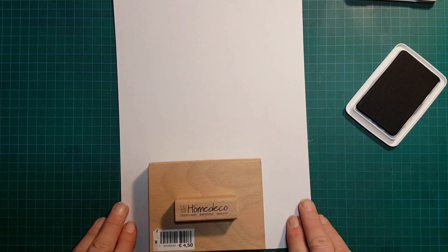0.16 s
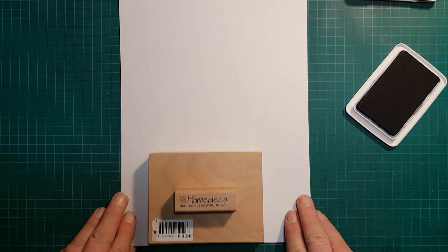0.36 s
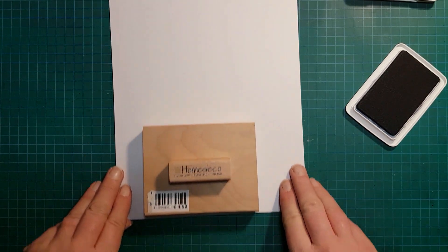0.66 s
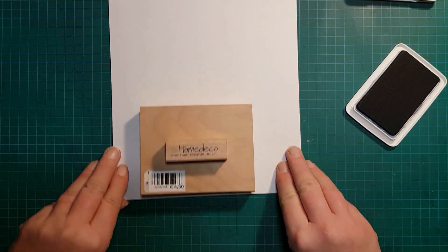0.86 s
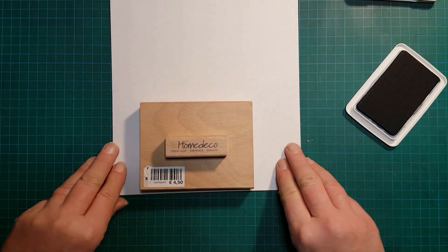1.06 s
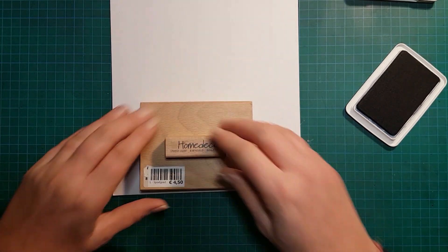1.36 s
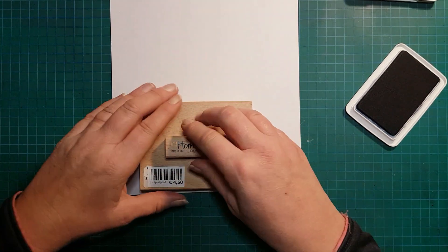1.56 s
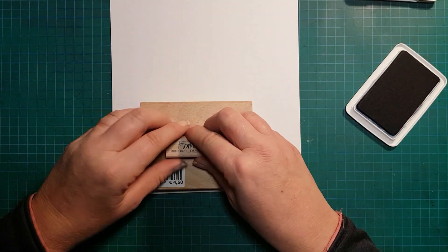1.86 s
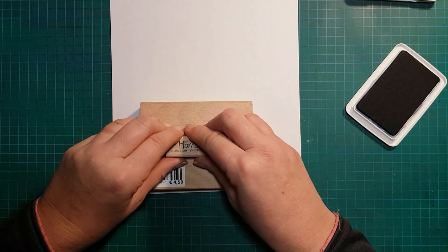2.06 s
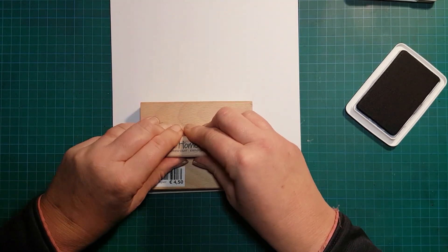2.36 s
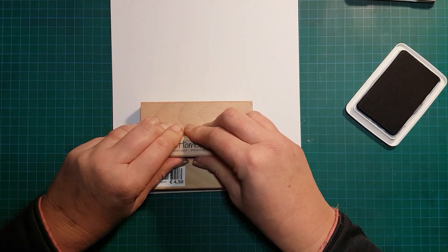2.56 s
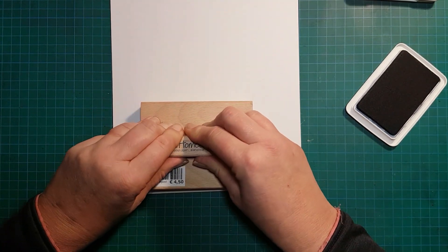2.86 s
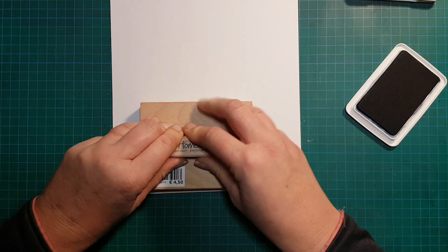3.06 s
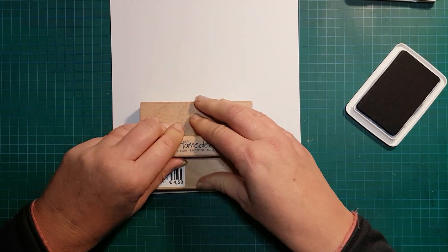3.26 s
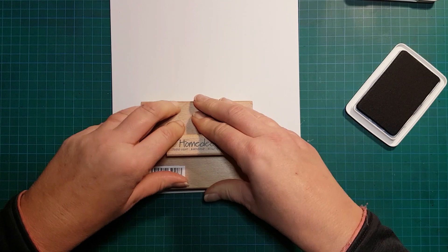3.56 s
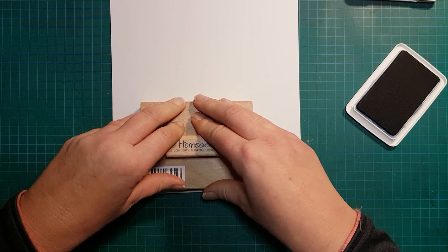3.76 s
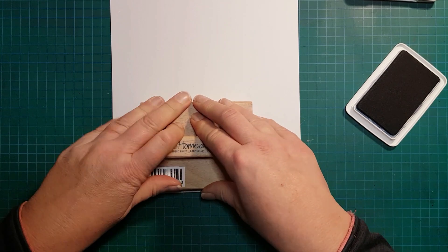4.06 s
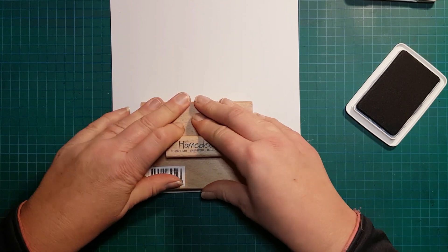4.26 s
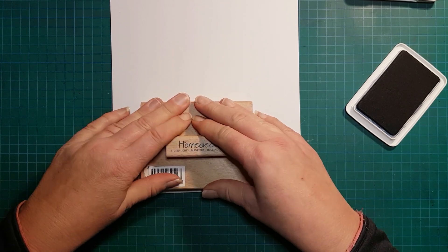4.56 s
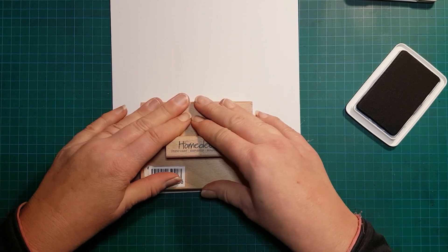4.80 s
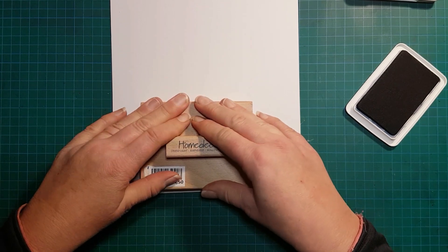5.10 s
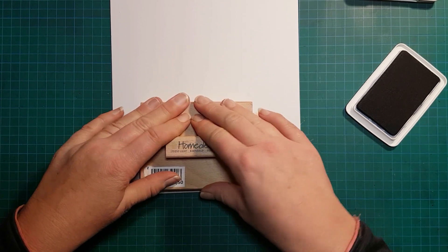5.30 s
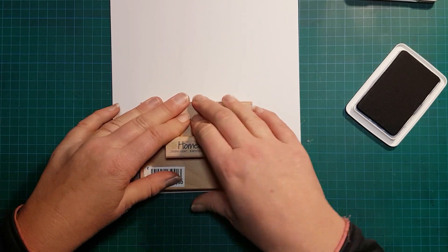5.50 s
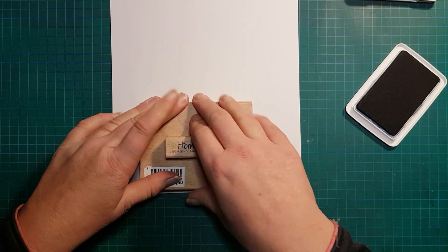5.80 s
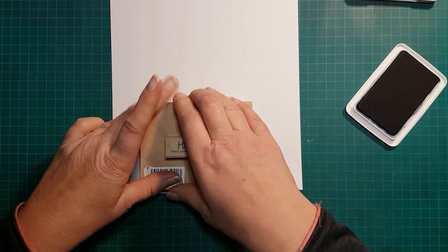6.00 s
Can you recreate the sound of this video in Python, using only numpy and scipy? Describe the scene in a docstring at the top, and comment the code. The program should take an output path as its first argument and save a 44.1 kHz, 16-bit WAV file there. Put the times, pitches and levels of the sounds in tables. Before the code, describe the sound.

A short dry paper slide, then soft irregular wooden knocks and dull table thumps as a stamp block is pressed down, over faint room hiss.

```python
"""A sheet of paper with a wooden stamp block on it is slid over a cutting mat on a table, in a small quiet room.
During the slide fibres rasp, the block judders, the paper ticks and the first knocks fall: filtered friction
grains, short noise bursts and sums of decaying modes. Two hands then press the block down: it rocks and knocks,
the table thumps and murmurs, and the rubber creaks on the paper. Later, fingertips skid over the wood as skin
and nail grains. Short diffuse reflections, room tone, hiss and steady tones last throughout."""
import sys
import numpy as np
from scipy import signal
from scipy.fft import rfft, irfft, next_fast_len
from scipy.io import wavfile

SR = 44100
rng = np.random.default_rng(int(sys.argv[2]) if len(sys.argv) > 2 else 0)


def digitize_waveform(pressure):
    """Quantize a signal to 16-bit integers and store it at the path in sys.argv[1].

    Rows of a 2-D input are taken as channels; values are limited to [-1, 1].
    """
    field = np.atleast_2d(pressure).T
    bounded = np.clip(field, -1, 1)
    quanta = np.round(bounded * 32767).astype(np.int16)
    wavfile.write(sys.argv[1], SR, quanta)


N = 270774
TIME = np.arange(N) / SR  # s

# fingers land on the block or press it home:
# [start_s, table_thump_db, block_knock_db, click_peak_db, click_brightness_hz]
TAPS = [(0.167, -42, -45.5, -47, 1090), (0.425, -34.5, -46, -34, 1500), (0.625, -39, -50, -25, 2250),
        (1.035, -68, -62, -33.5, 5860), (2.071, -54, -47, -34.5, 4170), (2.083, -57, -37.5, -40, 5300),
        (2.159, -55, -40, -37, 3500), (2.425, -47, -39, -57, 1500), (2.708, -58, -51, -44.5, 3000),
        (2.834, -62, -44, -57, 2000), (3.066, -44, -36, -38, 2500), (3.21, -38.5, -45, -59, 2500),
        (3.427, -31, -46, -37, 2550), (3.467, -29, -43.5, -45, 2500), (3.487, -33, -39.5, -44, 2500),
        (3.541, -30.5, -36, -35, 4530), (3.554, -34, -38.5, -51, 2500), (3.741, -31, -47, -46, 2500),
        (4.203, -60, -43, -34, 3350), (4.338, -35, -37.5, -41, 2160), (4.390, -32, -32.5, -34, 2490),
        (4.442, -40, -42.5, -41, 4400), (4.823, -31.5, -37, -34, 2500), (4.873, -36.5, -36.5, -35, 3300),
        (4.991, -50, -39, -36, 2730), (5.155, -39, -58, -50, 2000), (5.293, -41, -48, -43.5, 4000),
        (5.83, -41.5, -38, -39, 5700), (5.996, -32, -44, -33.5, 3100)]
# the block tips onto an edge and chatters back: [start_s, knock_db, hollow_clack_db, first_gap_s]
ROCKS = [(2.302, -34.5, -39.5, .008), (2.446, -33, -49, .009)]
TAP_CLACK_DB = -11  # the hollow clack, against the mean of knock and click
ROCK_GAP_GROWTH, ROCK_LOSS_DB = 2.7, 2  # from one contact to the next
ROCK_THUMP_DB, ROCK_CLICK_DB = -8.5, 2.5  # thump against the knock, click against the clack
ROCK_BRIGHTNESS_HZ = 1280

# modes of the table top: [pitch_hz, relative_level_db, t60_s]
TABLE_MODES = [(54.6, -6.5, 0.078), (108.8, -5, 0.13), (137, 2, 0.16), (149.6, -1.5, 0.12),
               (207.6, -13, 0.2), (249, -16, 0.16)]
# low modes of the wooden block: [pitch_hz, relative_level_db, t60_s]
BLOCK_MODES = [(218, 12.5, 0.033), (272.7, 4, 0.074), (304.3, -0.5, 0.077), (351.4, 5, 0.12),
               (452.5, -1, 0.087), (534.6, -9.5, 0.24), (579.7, -6, 0.061)]
# middle modes of the hollow clack: [pitch_hz, relative_level_db, t60_s]
HOLLOW_MODES = [(723, -3, 0.082), (830, 11.5, 0.018), (950, -7, 0.067), (1129, -8.5, 0.069),
                (1255, -3, 0.037)]
# upper modes of the block, in clicks and skids: [pitch_hz, relative_level_db, t60_s]
CLICK_MODES = [(1550, -21, 0.016), (1770, -19, 0.074), (1976, 5.5, 0.0094), (2258, -2, 0.026),
               (2497, -6.5, 0.039), (2775, 1, 0.015), (3440, -16, 0.076), (4200, -41, 0.025)]

# the hands shift, then bear down: [time_s, rubber_creak_db, table_rumble_db], before the trims below
PRESS = [(1.05, -68, -63), (1.25, -61.5, -82), (1.5, -71, -81), (1.82, -67.5, -58.5), (2.05, -49, -51.5),
         (2.25, -54, -58), (2.56, -55.5, -56), (2.68, -66.5, -69), (3.14, -54.5, -50.5), (3.36, -63, -65),
         (3.7, -60.5, -61), (3.83, -54, -57), (4.03, -55.5, -51.5), (4.2, -62, -64), (4.48, -55, -44.5),
         (4.6, -64.5, -71), (4.78, -59.5, -64), (5.25, -58, -62), (5.62, -63.5, -52.5), (5.88, -56.5, -56),
         (6.14, -58, -47.5)]
CREAK_TRIM_DB, MURMUR_TRIM_DB = -1.5, -2
CRACKLE_DB, CRACKLE_AT_CREAK_DB = -67, -55  # the paper's level where PRESS has that creak
CRACKLE_FOLLOWS = 0.64  # share of the creak's swing in dB
SLIPS_PER_S, SLIP_DB = 45, -12.5  # small slips of the rubber on the paper; level against the creak
# spectrum of the creaking rubber: [frequency_hz, relative_density_db]
CREAK_SPECTRUM = [(150, -2), (250, 1.5), (370, 5.5), (550, -4.5), (800, -8.5), (1400, -25)]
# spectrum of paper crackle and rubber slips: [frequency_hz, relative_density_db]
CRACKLE_SPECTRUM = [(600, -10), (1000, -1.5), (2100, 1), (3500, -5), (6000, -15), (12000, -14)]

# the sheet slides: [time_s, hiss_db, table_rumble_db], before the trims below
SLIDE = [(0.0, -58.5, -54), (0.036, -55, -47), (0.086, -56, -51.5), (0.16, -53.5, -46), (0.244, -57.5, -64),
         (0.394, -48.5, -49.5), (0.458, -43, -38.5), (0.572, -43, -40), (0.726, -41.5, -39),
         (0.968, -47.5, -49), (1.0, -73, -55.5)]
HISS_TRIM_DB, RUMBLE_TRIM_DB = 1.32, 0.35
# spectrum of paper rasping on the mat: [frequency_hz, relative_density_db]
PAPER_SPECTRUM = [(450, -2), (600, -19), (900, -9.5), (1500, -6), (2800, -7), (4000, -7.5), (5500, -6.5),
                  (7000, -12), (8300, -15), (10500, -12.5), (13500, -11), (16000, -16)]
# spectrum of the block juddering on the table: [frequency_hz, relative_density_db]
RUMBLE_SPECTRUM = [(35, -26), (60, -7.5), (100, -6.5), (128, 0.5), (145, 9), (165, -4), (190, -7.5),
                   (245, -4.5), (285, -11), (350, -6.5), (430, -21.5), (700, -18.5)]

# fingertips skid on the wood: [strongest_s, length_s, level_db, nail_scratch_share]
SKIDS = [(3.081, 0.019, -32, 0.96), (3.201, 0.045, -53.5, .6), (3.492, 0.042, -38, 0.04),
         (3.541, 0.033, -41.5, .02), (5.099, 0.029, -53, 0.08), (5.905, .014, -48, 0),
         (5.919, .016, -43.5, 0)]
# brief rubs and faint squeaks of skin and paper, and rings of a nail on the wood: [strongest_s, length_s,
# level_db, pitch_hz, width_hz]
BRUSHES = [(0.448, 0.04, -39.5, 4000, 1100), (0.809, 0.0094, -39, 1540, 250),
           (2.334, 0.041, -59.5, 5400, 4000), (3.081, .022, -38.5, 2510, 150),
           (3.223, 0.18, -58.5, 2880, 250), (3.275, 0.043, -47.5, 13000, 5800),
           (3.488, 0.021, -51, 9800, 900), (5.905, 0.037, -50.5, 730, 497)]
RISE_SHARE = 0.39  # of a stroke's length
# spectrum of skin on wood: [frequency_hz, relative_density_db]
SKIN_SPECTRUM = [(500, -9), (900, -19), (1400, -12), (1900, -5.5), (2400, -5.5), (3200, -15), (4500, -23),
                 (8000, -34), (16000, -28)]
# spectrum of a nail on wood: [frequency_hz, relative_density_db]
NAIL_SPECTRUM = [(800, -8.5), (1600, -25), (2000, 5.5), (2450, -15), (3300, -4), (4300, 0), (5300, -1),
                 (6500, -1.5), (8300, -12), (9800, -6), (13000, -8.5), (16000, -15)]

# the paper catches or ticks, with a short dry knock at 0.167 s: [start_s, peak_db, pitch_hz]
GRIT = [(0.127, -29, 5200), (0.167, -25, 434), (0.494, -25.5, 3980), (0.631, -20.5, 5160),
        (0.662, -21, 11800), (0.711, -30, 4500), (0.867, -23, 6050), (0.969, -33, 5600), (4.444, -36, 2940)]

# stereo width of the handling sounds: [frequency_hz, side_minus_mid_db]
NEAR_WIDTH = [(60, -20), (170, -24), (400, -9.5), (1300, -15), (2400, -9), (4400, -2), (8000, 3),
              (15000, -1)]
# stereo width of the room tone and hiss: [frequency_hz, side_minus_mid_db]
ROOM_WIDTH = [(60, -10), (200, -1), (400, 1), (15000, 0)]
# spectrum of the room tone: [frequency_hz, relative_density_db]
ROOM_TONE_SPECTRUM = [(25, -38), (38, 2.5), (55, 3.5), (75, 3.5), (110, -2), (180, 0), (240, -5), (430, -6),
                      (920, -8.5), (1800, -10.5), (2900, -14), (4500, -19), (7000, -24.5)]
# spectrum of the microphone hiss: [frequency_hz, relative_density_db]
HISS_SPECTRUM = [(6000, -16), (8500, -12), (11000, -6), (13000, -2), (15000, 1), (16000, 1)]
# steady tones of the room and its electronics: [pitch_hz, width_hz, level_db]
TONES = [(138, 14, -68), (8215, 8, -90), (13302, 14, -77), (13340, 160, -77)]
ROOM_TONE_DB, HISS_DB = -57, -61.5
ROOM_T60_S, REFLECTIONS_DB = 0.14, -6.5
CUTOFF_HZ = 15900


def from_db(db):
    """Amplitude gain is ten to the power of the level over 20."""
    return 10 ** (np.asarray(db) / 20)


def rms_one(x):
    """Normalisation: root mean square 1."""
    return x / np.sqrt(np.mean(x ** 2) + 1e-20)


def gains(rows):
    """Envelopes: one gain curve per dB column, with a Gaussian fade beyond the rows."""
    s, *columns = np.transpose(rows)
    beyond = np.abs(TIME - np.clip(TIME, s[0], s[-1]))
    fade = np.exp(-(beyond / 0.041) ** 2)
    return [from_db(np.interp(TIME, s, db)) * fade for db in columns]


def gain_at(points, hz):
    """Interpolation of a dB spectrum on a log-frequency axis."""
    f, db = np.transpose(points)
    return from_db(np.interp(np.log(hz + 1e-3), np.log(f), db))


def colour(pair, spectrum, width):
    """Mid and side: two unrelated signals become left and right with a given spectrum and width; rms 1."""
    size = next_fast_len(N)
    hz = np.arange(size // 2 + 1) * SR / size
    mid, side = rfft(pair, size)
    spread = gain_at(width, hz)
    both = (mid + spread * side * [[1], [-1]]) / np.hypot(1, spread)
    low_end = np.minimum(hz / spectrum[0][0], 1) ** 2
    high_end = np.minimum(spectrum[-1][0] / (hz + 1), 1) ** 2
    shaped = both * gain_at(spectrum, hz) * low_end * high_end
    return rms_one(irfft(shaped, size)[:, :N])


def cut(x, hz, kind, order=2):
    """Butterworth low- or high-pass filtering."""
    return signal.sosfilt(signal.butter(order, min(hz, .45 * SR), kind, fs=SR, output="sos"), x)


def resonate(x, hz, width_hz):
    """A single resonance: a pole pair whose radius sets the bandwidth, with gain 1 on top."""
    r = np.exp(-np.pi * width_hz / SR)
    feedforward = np.array([1, 0, -1]) * (1 - r * r) / 2
    feedback = [1, -2 * r * np.cos(2 * np.pi * hz / SR), r * r]
    return signal.lfilter(feedforward, feedback, x)


def ring_modes(x, modes, width_times_t60):
    """Driven modes: a shorter decay means a wider resonance; neighbours have opposite signs; rms 1."""
    total = 0
    for k, (hz, db, t60) in enumerate(modes):
        total = total + (-1) ** k * from_db(db) * resonate(x, hz, width_times_t60 / t60)
    return rms_one(total)


def add(out, s, sound):
    """Superposition: mix a short stereo sound in at time s."""
    at = max(round(s * SR), 0)
    out[:, at:at + sound.shape[-1]] += sound[:, :max(N - at, 0)]


def flutter(per_s, depth_db):
    """Random modulation: a gain that wanders between random knots."""
    knots = rng.standard_normal(4096)
    return from_db(depth_db * np.interp(TIME * per_s, np.arange(len(knots)), knots))


def grains(per_s, spread_db):
    """Dry friction: two streams of tiny slips of uneven size and random sign; rms 1."""
    sizes = from_db(spread_db * np.minimum(rng.exponential(1, (2, N)), 5))
    slips = rng.random((2, N)) < per_s / SR
    return rms_one(slips * sizes * rng.choice([-1, 1], (2, N))) + 1e-18


def swell(s, length):
    """Stroke envelope: an uneven Gaussian that is strongest at time s."""
    side_length = length * np.where(TIME < s, RISE_SHARE, 1 - RISE_SHARE)
    return np.exp(-np.minimum(((TIME - s) / side_length) ** 2, 60))


def strike(modes, scatter_db, phase_spread):
    """Modal excitation: each mode rings at its own strength, with its own phase on each side; early rms 1."""
    hz, db, t60 = np.transpose(modes)[:, :, None]
    t = np.arange(SR // 3) / SR
    strength = from_db(db + scatter_db * rng.standard_normal(hz.shape))
    loaded_hz = hz * (1 + 0.015 * rng.standard_normal(hz.shape))  # the hands load the wood differently each time
    phase = phase_spread * rng.standard_normal((2, len(hz), 1))  # radians
    decay = from_db(-60 * t / t60)
    ring = (strength * decay * np.sin(2 * np.pi * loaded_hz * t + phase)).sum(axis=1)
    return ring / np.sqrt(np.mean(ring[:, :SR // 50] ** 2))


def contacts():
    """Repeated impact: a tap is one contact; a rock is three, ever weaker and further apart."""
    for s, thump_db, knock_db, click_db, bright_hz in TAPS:
        clack_db = (knock_db + click_db) / 2 + TAP_CLACK_DB
        yield s, click_db, thump_db, knock_db, clack_db, bright_hz
    for s, first_knock_db, first_clack_db, gap in ROCKS:
        for k in range(3):
            knock_db = first_knock_db - k * ROCK_LOSS_DB
            clack_db = first_clack_db - k * ROCK_LOSS_DB
            click_db = clack_db + ROCK_CLICK_DB
            thump_db = knock_db + ROCK_THUMP_DB
            yield s, click_db, thump_db, knock_db, clack_db, ROCK_BRIGHTNESS_HZ
            s = s + gap * ROCK_GAP_GROWTH ** k


def knocks():
    """Compliant impact: the wood clicks at once; block and table follow as the rubber and mat compress."""
    out, t = np.zeros((2, N)), np.arange(SR // 3) / SR
    for s, click_db, thump_db, knock_db, clack_db, bright_hz in contacts():
        shared, left, right = rng.standard_normal((3, len(t)))
        contact = shared + .5 * np.array([left, right])
        crack = contact * (np.exp(-t / .001) + .16 * np.exp(-t / .007))
        wood = strike(CLICK_MODES, scatter_db=2, phase_spread=.5)
        # a softer contact lasts longer and sounds lower
        bright = cut(wood + 8 * crack, bright_hz * 0.57, "high")
        body = cut(bright, bright_hz * 1.04, "low", order=3)
        click = body + 0.056 * cut(bright, bright_hz * 3, "low", order=1)
        thump = -strike(TABLE_MODES, scatter_db=3.7, phase_spread=0.07) * (1 - np.exp(-t / 0.0065))
        knock = -strike(BLOCK_MODES, scatter_db=5.5, phase_spread=0.54) * (1 - np.exp(-t / 0.0034))
        clack = strike(HOLLOW_MODES, scatter_db=1.5, phase_spread=0.55) * (1 - np.exp(-t / 0.0024))
        add(out, s, from_db(click_db) * click / np.abs(click).max())
        add(out, s, from_db(thump_db) * thump + from_db(knock_db) * knock + from_db(clack_db) * clack)
    return out


def press():
    """Stick-slip under load: the table murmurs, the rubber creeps and slips, and the paper crackles faintly."""
    creak, rumble = gains(PRESS)
    crackle = (creak / from_db(CRACKLE_AT_CREAK_DB)) ** CRACKLE_FOLLOWS
    tremor = colour(grains(800, spread_db=0.5), [(35, 0), (250, 0)], NEAR_WIDTH)
    table = ring_modes(tremor, TABLE_MODES, 0.83)
    creep = colour(grains(1800, spread_db=2.65), CREAK_SPECTRUM, NEAR_WIDTH)
    paper = colour(grains(1900, spread_db=4.0), CRACKLE_SPECTRUM, NEAR_WIDTH)
    slips = colour(grains(SLIPS_PER_S, spread_db=1.0), CRACKLE_SPECTRUM, NEAR_WIDTH)
    rubber = creep + from_db(SLIP_DB) * slips
    out = from_db(MURMUR_TRIM_DB) * rumble * table
    out += from_db(CREAK_TRIM_DB) * creak * rubber
    return out + from_db(CRACKLE_DB) * crackle * paper


def slide():
    """Sliding friction: fibres rasp over the mat, each patch at its own pitch; the dragged block judders."""
    hiss, rumble = gains(SLIDE)
    edges = np.geomspace(300, 19200, 10)  # Hz
    patches = 0
    for low, high in zip(edges, edges[1:]):
        above = cut(grains(12000, spread_db=3.5), low, "high", order=4)
        patches = patches + cut(above, high, "low", order=4) * flutter(160, depth_db=3)
    rasp = colour(patches, PAPER_SPECTRUM, NEAR_WIDTH)
    judder = colour(grains(1200, spread_db=2), RUMBLE_SPECTRUM, NEAR_WIDTH)
    return from_db(HISS_TRIM_DB) * hiss * rasp + from_db(RUMBLE_TRIM_DB) * rumble * judder


def skids():
    """Stick-slip excitation: skin sets the block's upper modes ringing; a nail adds a bright scratch."""
    out = np.zeros((2, N))
    skin = colour(grains(6500, spread_db=3.0), SKIN_SPECTRUM, NEAR_WIDTH)
    nail = colour(grains(8200, spread_db=2.0), NAIL_SPECTRUM, NEAR_WIDTH)
    ring = ring_modes(skin, CLICK_MODES, 0.99)
    skin = rms_one(skin + from_db(-17.0) * ring)
    for s, length, db, scratch in SKIDS:
        mixture = np.sqrt(1 - scratch) * skin + np.sqrt(scratch) * nail  # shares of power
        out += from_db(db) * swell(s, length) * mixture
    return out * flutter(380, depth_db=0.5)


def brushes():
    """Resonant friction: rubs and squeaks of skin and paper, and rings of a nail on the wood, are noise through
    one resonance each."""
    out = np.zeros((2, N))
    rub = rng.standard_normal((2, N))
    for s, length, db, hz, width_hz in BRUSHES:
        out += from_db(db) * swell(s, length) * rms_one(resonate(rub, hz, width_hz))
    return out


def grit():
    """Impulsive excitation: each sharp tick of the paper, and the short dry knock at 0.167 s, is a brief noise
    burst through one resonance."""
    out, t = np.zeros((2, N)), np.arange(SR // 50) / SR
    for s, db, hz in GRIT:
        burst = rng.standard_normal((2, len(t))) * np.exp(-t / 0.00035)
        tick = resonate(burst, hz, hz * 0.33)
        add(out, s, from_db(db) * tick / np.abs(tick).max())
    return out


def room(x):
    """Diffuse reverberation: exponentially decaying noise, different on each side, with little bass."""
    t = np.arange(SR // 2) / SR
    noise = rng.standard_normal((2, len(t))) * np.clip((t - .003) / 0.0039, 0, 1)
    tail = noise * from_db(-60 * t / ROOM_T60_S)
    tail = cut(tail / np.sqrt(np.sum(tail ** 2) / 2), 340, "high")
    return signal.fftconvolve(x, tail, axes=1)[:, :N]


def background():
    """Stationary noise: room tone and microphone hiss, with a low hum and a thin whine as narrow bands."""
    out = from_db(ROOM_TONE_DB) * colour(rng.standard_normal((2, N)), ROOM_TONE_SPECTRUM, ROOM_WIDTH)
    out += from_db(HISS_DB) * colour(rng.standard_normal((2, N)), HISS_SPECTRUM, ROOM_WIDTH)
    for hz, width_hz, db in TONES:
        out += from_db(db) * rms_one(resonate(rng.standard_normal((2, N)), hz, width_hz))
    return out


def scene():
    """Superposition of all handling sounds, their reflections and the background."""
    blows = knocks() + grit() + skids() + brushes()
    friction = slide() + press()
    reflections = room(blows) + room(friction)
    near = blows + friction + from_db(REFLECTIONS_DB) * reflections
    return near * from_db([[-.5], [.5]]) + background()  # the handling leans slightly to the right


def record(dry):
    """Band limiting: an elliptic low-pass cuts the top steeply."""
    return signal.sosfilt(signal.ellip(12, .1, 80, CUTOFF_HZ, fs=SR, output="sos"), dry)


dry = scene()
out = record(dry)
digitize_waveform(out)
```